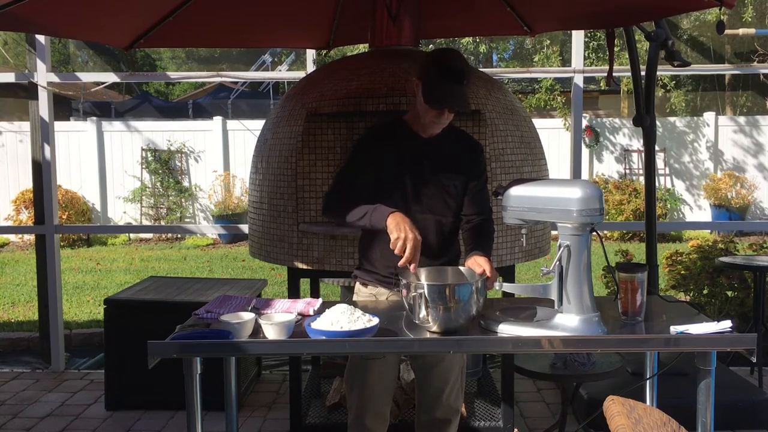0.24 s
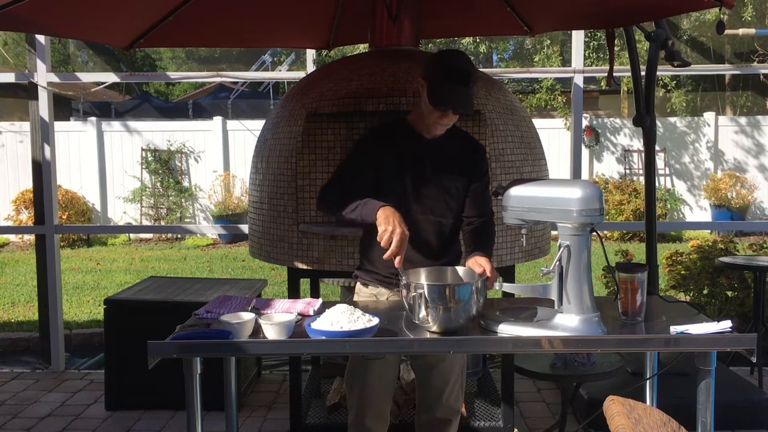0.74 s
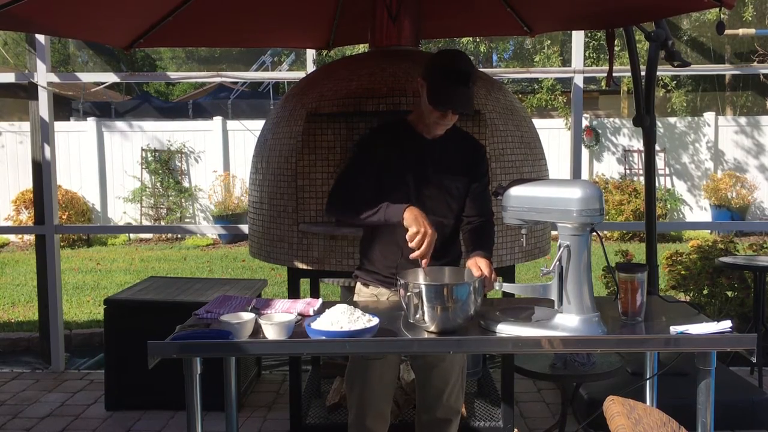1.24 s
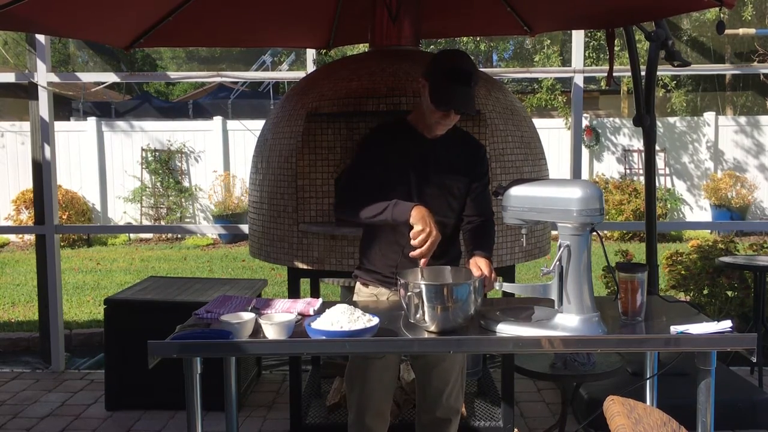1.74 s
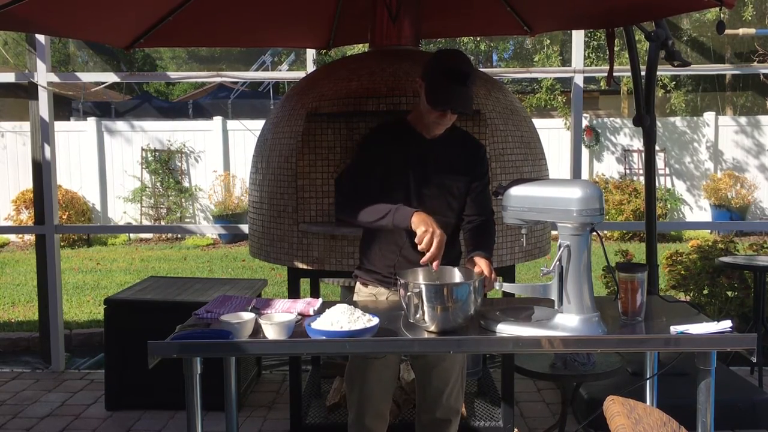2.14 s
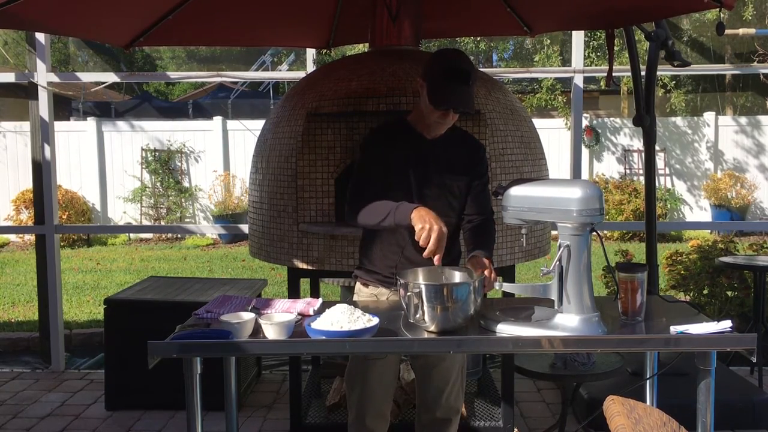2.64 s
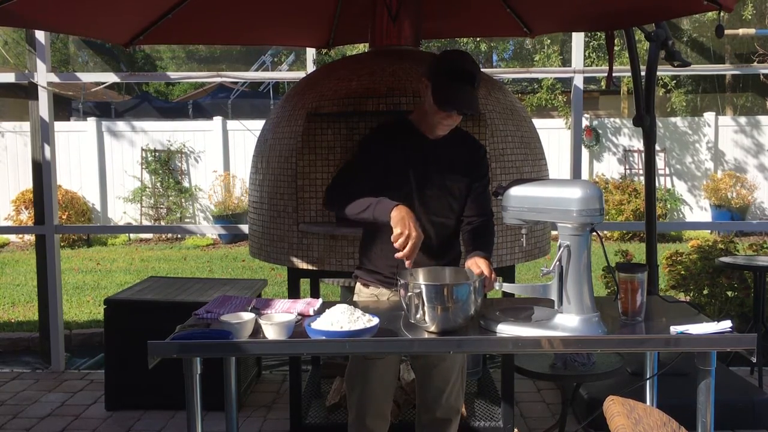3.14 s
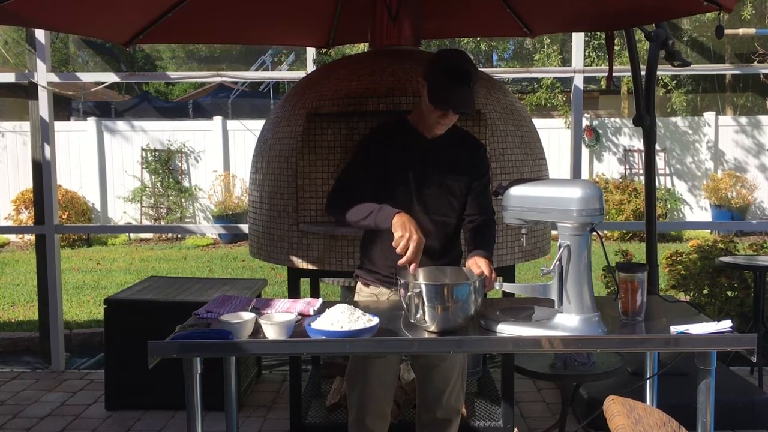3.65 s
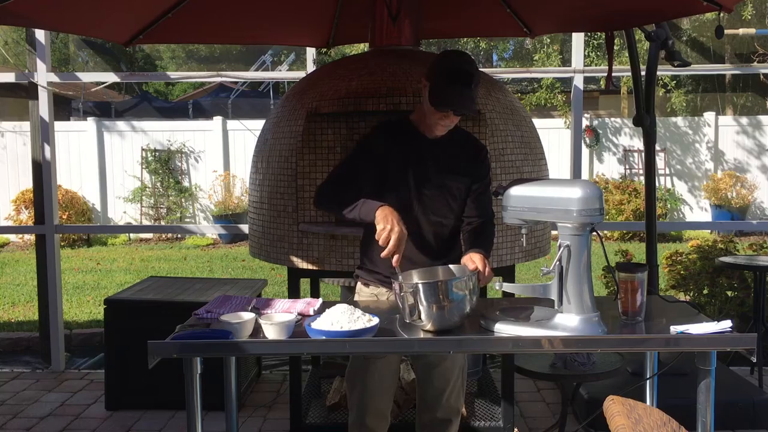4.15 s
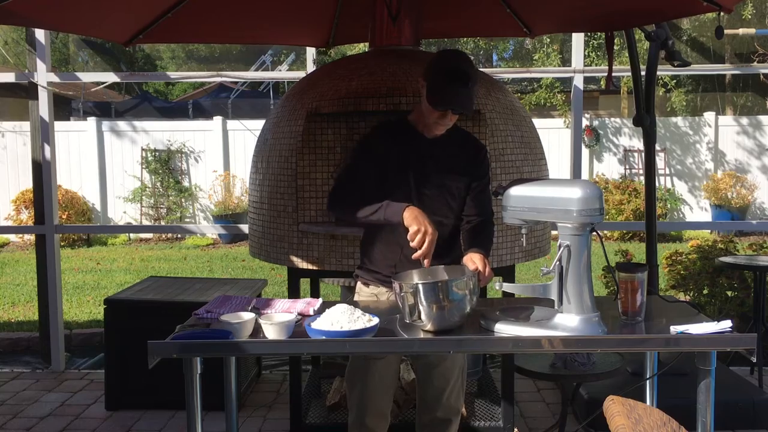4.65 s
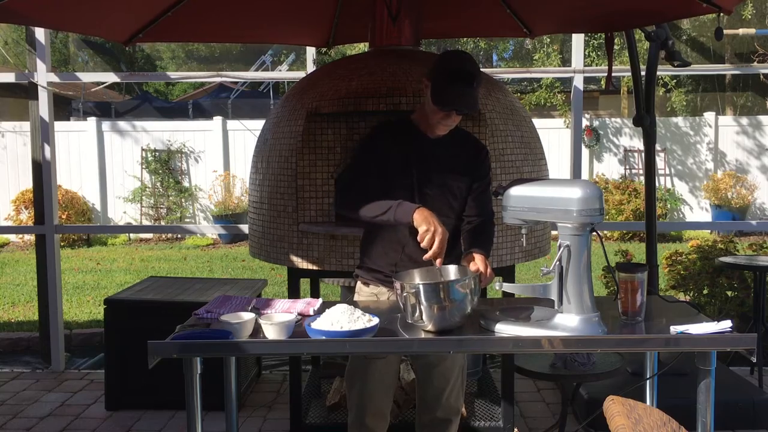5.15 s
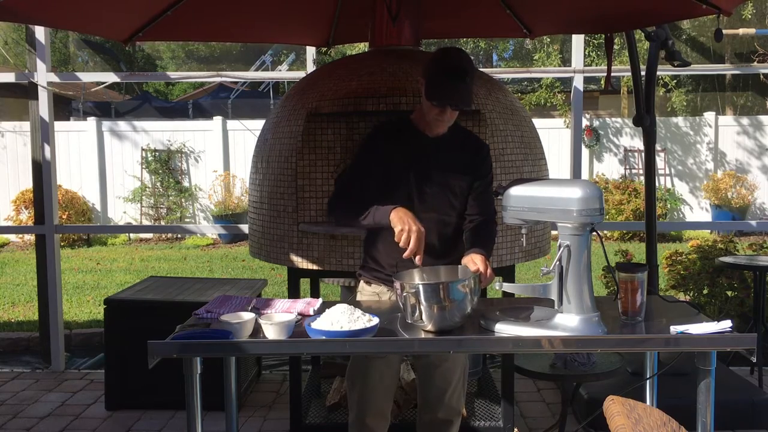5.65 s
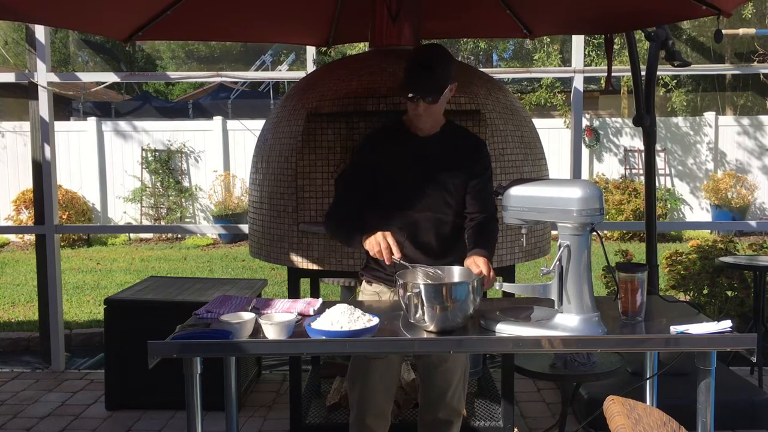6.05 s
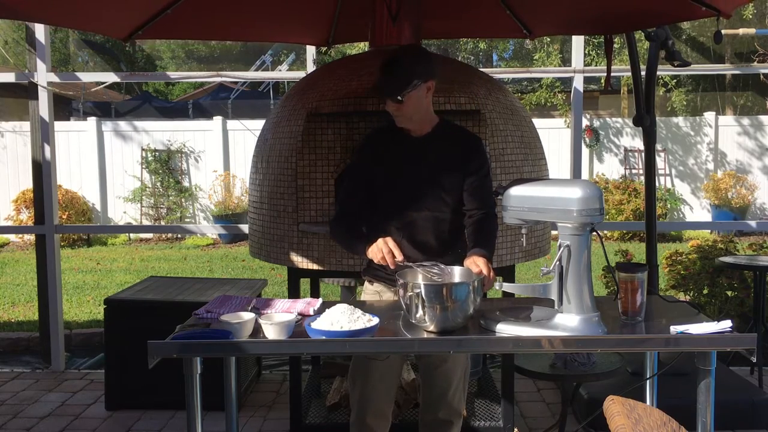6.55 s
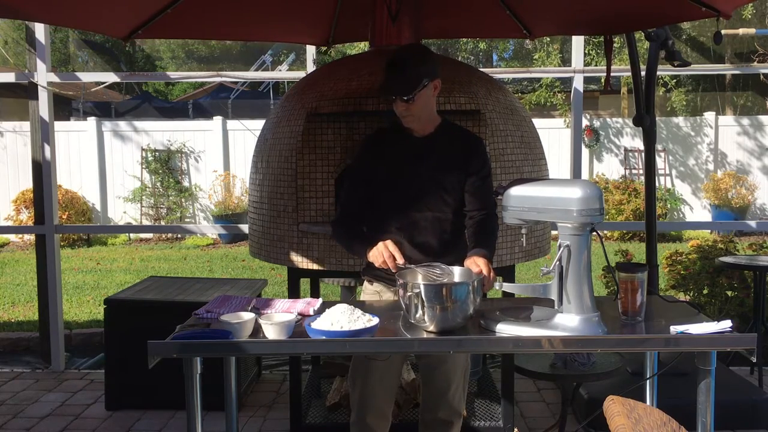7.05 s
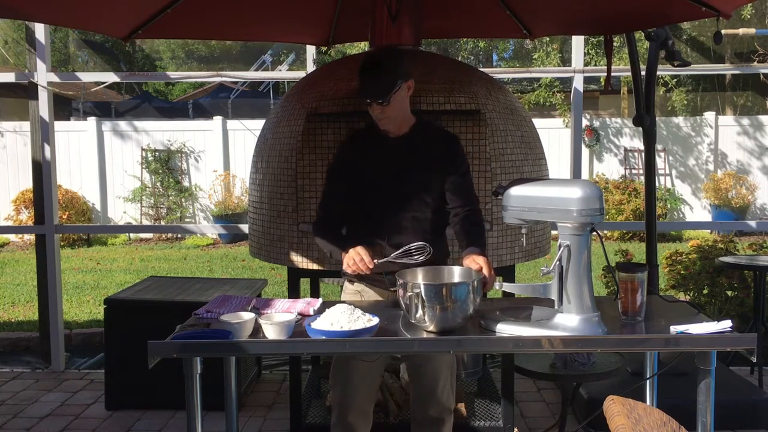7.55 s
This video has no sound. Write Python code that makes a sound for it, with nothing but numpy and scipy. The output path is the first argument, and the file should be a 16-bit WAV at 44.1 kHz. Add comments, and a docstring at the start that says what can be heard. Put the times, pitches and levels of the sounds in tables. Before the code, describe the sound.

On an open patio, a wire whisk sweeps around a steel bowl of thin batter, with bright scratchy swishes, irregular wire clinks and soft wet plops. After about six seconds it is knocked eight times on the rim, each a loud rattly metallic tap with a faint table thud and droplets. A brief slide ends it, leaving quiet air and low hum. One microphone, fairly dry.

```python
"""A wire whisk stirs thin batter in a steel bowl on a covered patio, over garden air and a distant hum.
Sweep by sweep, random wire contacts make whisk and bowl ring, while bubble tones slosh and plop.
Then the whisk is knocked eight times on the rim: chattering impacts ring the steel, thud and rock
the work table, and fling batter that patters back into the bowl. Last, the whisk slides off the rim."""
import sys
import numpy as np
from scipy import signal
from scipy.fft import rfft, irfft
from scipy.io import wavfile
from scipy.ndimage import uniform_filter1d

SR = 44100
rng = np.random.default_rng(int(sys.argv[2]) if len(sys.argv) > 2 else 0)


def log_audio(samples):
    """Write samples as a 16-bit WAV file to the path given in sys.argv[1]."""
    # one column per channel
    frames = np.atleast_2d(samples).T
    # limit to full scale, then quantise
    limited = np.clip(frames, -1, 1)
    pcm = np.round(limited * 32767).astype(np.int16)
    wavfile.write(sys.argv[1], SR, pcm)


N = 344421  # length of the scene in samples
T = np.arange(N) / SR  # time in seconds

# Ringing tones of the filled bowl: pitch_hz, relative level_db, t60_s (time to fall by 60 dB)
BOWL_TONES = [(658, -12, 0.44), (1069, 1.5, 0.13), (1740, -34, .12), (2140, 4.5, 0.1), (2390, -15, 0.1),
              (2347, 14.5, 0.014), (2700, 13, 0.038), (3113, 4, 0.061), (3670, 10, 0.074),
              (3908, 10.5, 0.041), (4310, 5, 0.074), (4900, -13, 0.1)]
# Tone colour of wires dragging on steel: frequency_hz, relative level_db
DRAG_COLOUR = [(200, -59), (1000, -28.5), (3000, -34), (5300, -16), (6200, -6), (7300, -1), (8500, -6),
               (10000, -13.5), (12000, -22.5), (15800, -33)]
# Whisk knocks on the rim: start_s, relative level_db, relative table_thud_db, chatter_length_s,
# wire_pitch_hz, relative flung_batter_db
RIM_KNOCKS = [(6.066, -14.5, -36.5, 0.011, 6500, -52), (6.243, -11, -40, 0.0057, 5860, -39),
              (6.395, -12, -32, 0.011, 7550, -28.5), (6.566, -11, -28, 0.016, 8100, -26.5),
              (6.728, -10, -30.5, 0.011, 6900, -22.5), (6.91, -8.5, -27.5, .0083, 6200, -31),
              (7.101, -11.5, -32, 0.0076, 6500, -36), (7.293, -13.5, -31.5, 0.013, 7800, -23)]


def amp(db):
    """Turns decibels into a gain."""
    return 10 ** (np.asarray(db) / 20)


def evened(x):
    """Scales a sound to an average (rms) level of 1."""
    return x / np.sqrt(np.mean(x ** 2) + 1e-20)


def read(points, hz):
    """Reads between the points of a frequency table, on a logarithmic frequency axis."""
    f, value = np.transpose(points)
    return np.interp(np.log(hz + 1), np.log(f + 1), value)


def add(mix, s, sound):
    """Mixes a sound in at time s."""
    part = mix[max(round(s * SR), 0):][:len(sound)]
    part += sound[:len(part)]


def through(x, response):
    """Passes a sound through a response (convolution) and keeps its length."""
    return signal.oaconvolve(x, response)[:len(x)]


def colour(points, size=4096):
    """Makes a filter of energy 1 with the given spectrum, acting only after its input arrives."""
    log_gain = np.log(amp(read(points, abs(np.fft.fftfreq(size, 1 / SR)))))
    spectrum = np.exp(np.conj(signal.hilbert(log_gain)))
    response = np.fft.ifft(spectrum).real[:size // 2]
    return response / np.linalg.norm(response)


def ring(modes):
    """An object struck once: a set of tones, each dying at its own speed, of total energy 1."""
    t = T[:SR // 2]
    response = np.zeros(len(t))
    for hz, db, t60 in modes:
        fade = np.exp(-np.log(1000) * t / t60)
        response += amp(db) * fade * np.sin(2 * np.pi * hz * t) * rng.choice([-1, 1])
    return response / np.linalg.norm(response)


def shimmer(t60, tick):
    """A tick, then a fading noise for the countless close tones of thin steel, flat overall."""
    t = T[:SR // 10]
    tail = rng.standard_normal(len(t)) * np.exp(-np.log(1000) * t / t60)
    tail /= np.linalg.norm(tail)
    tail[0] += tick
    z = rfft(tail)
    # dividing by the smoothed spectrum flattens the broad colour but keeps the fine detail
    flat = irfft(z / np.sqrt(uniform_filter1d(abs(z) ** 2, size=90)))
    return flat * np.cos(np.pi / 2 * t / t[-1])


def contacts(count, per_s, spread_db):
    """Tiny impacts at random moments, of either sign and uneven size unless the spread is 0; rms 1."""
    chance, size, side = rng.random((3, count), dtype=np.float32)
    at, out = chance < per_s / SR, np.zeros(count)
    strength = amp(spread_db * np.minimum(-np.log(1 - size[at]), 4))
    out[at] = strength * np.sign(side[at] - .5)
    return evened(out)


def burst(rise, length, per_s, spread_db):
    """A first touch, then a bunch of impacts that swells and dies; rms about 1 at its height."""
    t = T[:SR // 5]
    shape = np.minimum(0.35 + t / max(rise, 1e-4), 1) * np.exp(-(t / length) ** 2)
    shape /= shape.max()
    hits = contacts(len(t), per_s, spread_db)
    hits[0] = np.sqrt(SR / per_s) * 2  # the first touch
    hits *= shape
    return hits * np.linalg.norm(shape) / (np.linalg.norm(hits) + 1e-9)


def flutter(per_s):
    """A random wobble: straight lines between chance values drawn per_s times a second."""
    return np.interp(T * per_s, np.arange(SR // 10), rng.standard_normal(SR // 10))


def gesture(start, length, attack_s, sag_db_per_s, release_db_per_s):
    """Loudness of one movement over the whole scene: attack, a sagging hold, release."""
    t, out = T[:SR], np.zeros(N)
    fall_db = sag_db_per_s * t + release_db_per_s * np.maximum(t - length, 0)
    add(out, start, np.minimum(t / attack_s, 1) * amp(-fall_db))
    return out


def background():
    """Garden air is coloured noise of wavering level; a distant machine hums on a low tone."""
    # Tone colour of the air: frequency_hz, relative level_db
    air_colour = [(20, -5), (62, -7.5), (100, -5.5), (170, -15), (220, -13.5), (400, -19), (670, -18),
                  (1100, -21.5), (2000, -27.5), (4500, -27.5), (8300, -28.5), (12000, -36.5), (15800, -67)]
    noise = through(rng.standard_normal(N), colour(air_colour))
    air = amp(-43.5) * noise * amp(0.14 * flutter(per_s=8.5))
    # the hum's phase wanders slightly
    hum = amp(-43) * np.sin(2 * np.pi * 59 * T + 0.22 * flutter(per_s=2.5))
    return air + hum


def stirring():
    """Each sweep presses the wires on the wall and churns the liquid; the stronger of overlaps counts."""
    # Sweeps round the wall: start_s, length_s, press_on_s, relative scrape_db, relative churn_db
    strokes = [(0, 0.013, .005, -31, -43), (0.04, 0.18, 0.033, -26, -39), (0.309, .15, 0.026, -24, -37),
               (0.576, 0.11, .02, -25, -46.5), (0.765, 0.12, 0.015, -22, -41.5),
               (0.971, 0.25, 0.039, -26, -43.5), (1.223, 0.081, 0.016, -25, -42.5),
               (1.354, 0.27, 0.022, -28.5, -43), (1.644, 0.24, 0.023, -28.5, -45),
               (1.904, 0.094, 0.026, -23, -40.5), (2.023, 0.07, .025, -24, -40),
               (2.137, 0.045, .02, -25, -41), (2.219, 0.12, .02, -21.5, -37.5),
               (2.384, 0.19, .01, -36.5, -47.5), (2.685, 0.13, .025, -28.5, -46),
               (2.867, 0.27, 0.051, -24, -47), (3.061, 0.19, .02, -24, -46),
               (3.327, 0.23, 0.018, -24.5, -42), (3.624, 0.19, .02, -25.5, -40),
               (3.853, 0.24, 0.13, -26.5, -44), (4.203, 0.13, 0.018, -24.5, -43),
               (4.38, 0.23, 0.038, -27.5, -44), (4.52, 0.16, 0.08, -21, -44),
               (4.734, 0.22, 0.018, -27, -38.5), (4.985, 0.2, 0.011, -26.5, -37.5),
               (5.201, 0.2, .02, -27.5, -37.5), (5.415, 0.03, .02, -28, -37),
               (5.512, 0.09, 0.049, -22.5, -33.5)]
    # the wires ease off through the sweep, then leave the wall
    ease_db_per_s, lift_db_per_s = 0.5, 306
    # the liquid surges, settles through the sweep, then runs back
    surge_s, settle_db_per_s, drain_db_per_s = 0.024, 23, 115
    pressure, churn = np.zeros((2, N))
    for s, length, press_s, scrape_db, wet_db in strokes:
        press = amp(scrape_db) * gesture(s, length, press_s, ease_db_per_s, lift_db_per_s)
        slosh = amp(wet_db) * gesture(s, length, surge_s, settle_db_per_s, drain_db_per_s)
        pressure = np.maximum(pressure, press)
        churn = np.maximum(churn, slosh)
    return pressure, churn


def whisking(pressure, size=3000):
    """Wires stick and slip along the wall and clash on it; whisk and bowl ring with each contact."""
    # Wire loops hitting the wall in a bunch: start_s, relative level_db, rise_s, fade_length_s
    clashes = [(0.057, -12, 0.015, 0.031), (0.145, -21.5, .002, 0.012), (0.295, -16, 0.0022, 0.0074),
               (0.33, -6, 0.011, 0.025), (0.571, -9, .004, 0.026), (0.765, -14.5, 0.016, 0.033),
               (1.062, -20.5, .002, .017), (1.105, -19.5, .002, 0.015), (1.374, -27.5, .002, 0.0091),
               (1.472, -21, .005, 0.034), (1.741, -17, 0.0032, .0075), (1.814, -22, .002, 0.028),
               (2.137, -11.5, 0.0012, 0.025), (2.231, -14, .001, 0.0046), (2.244, -20, .004, 0.016),
               (2.433, -20, 0.0088, 0.016), (2.564, -31.5, .002, 0.012), (2.634, -24, .002, 0.0067),
               (2.657, -22.5, 0.0018, .014), (3.065, -14.5, 0.0052, 0.024), (3.319, -20, .002, 0.034),
               (3.618, -21, .0005, 0.02), (3.643, -14, .0036, 0.029), (3.907, -7, .003, 0.024),
               (3.974, -19, 0.0017, 0.017), (4.049, -21, .002, 0.021), (4.196, -9.5, 0.014, 0.019),
               (4.279, -20, 0.0018, 0.029), (4.502, -17.5, .001, 0.011), (4.754, -23, .002, 0.016),
               (4.795, -22.5, .002, 0.012), (4.86, -19.5, .002, 0.008), (4.989, -22, 0.0022, 0.0055),
               (5.215, -21, .002, 0.0076), (5.24, -18, 0.0044, 0.021), (5.288, -19.5, .002, 0.0093),
               (5.357, -24.5, .002, 0.016), (5.432, -24.5, .002, 0.03), (5.467, -18.5, .002, 0.0065),
               (5.606, -11.5, 0.022, 0.025)]
    # Tone colour of the clashing wires: frequency_hz, relative level_db
    wire_colour = [(100, -26), (350, -31), (1000, -20), (1900, -22), (2600, -15.5), (4600, -14.5),
                   (5500, -9), (6200, -1.5), (7300, 2), (8500, -1), (10000, -9.5), (11500, -16),
                   (15800, -28.5)]
    slips = contacts(N, per_s=3000, spread_db=0.0) * amp(3.8 * flutter(per_s=70))
    snags = amp(-5.5) * contacts(N, per_s=93, spread_db=4.0)
    drag = (slips + snags) * pressure * amp(-3.5)
    loops, clash, wires = np.zeros((3, N))
    # as the whisk turns, one loop after another takes the load, each with its own tones
    handover = np.sin(np.pi * np.arange(size) / size)
    for start in range(0, N - size, size // 2):
        load = drag[start:start + size] * handover
        add(loops, start / SR, signal.fftconvolve(load, shimmer(t60=0.019, tick=0.56)))
    for s, db, rise, length in clashes:
        hits = amp(db + 1.75) * burst(rise, length, per_s=1800, spread_db=4)
        add(clash, s, hits)
        add(wires, s, signal.fftconvolve(hits, shimmer(t60=0.018, tick=0.58)))
    bowl = through(amp(-22.5) * drag + amp(-20.5) * clash, ring(BOWL_TONES))
    return through(loops, colour(DRAG_COLOUR)) + through(wires, colour(wire_colour)) + bowl


def bubble(hz, cycles, glide):
    """A pocket of air ringing, its pitch rising as it nears the surface."""
    age = T[:SR // 10] * hz / cycles  # 1 when the fade has reached about a third
    tone = np.sin(2 * np.pi * cycles * (age + glide * age ** 2))
    tone *= np.exp(-age) * (1 - np.exp(-8 * age))
    return tone / np.linalg.norm(tone)


def liquid(churn, count=28):
    """Wet crackle and small bubbles follow the stirring; tone clusters are short bunches of
    bubble-like tones, from low to bright."""
    # Short clusters of bubble-like tones, low to bright, some sounding with the wire clashes:
    # start_s, relative level_db, pitch_hz, length_s
    tone_clusters = [(.276, -31.5, 336, 0.0048), (.078, -33, 2480, 0.018), (.296, -33, 1660, 0.029),
                     (.338, -40, 1324, 0.0075), (0.363, -33, 597, 0.027), (.622, -37.5, 1050, 0.013),
                     (0.847, -38, 1090, 0.014), (1.064, -36, 1170, 0.016), (1.133, -38.5, 226.5, 0.035),
                     (1.357, -32.5, 536, .019), (2.136, -37.5, 393, 0.035), (2.141, -22.5, 3500, .013),
                     (2.238, -30, 3040, .019), (3.322, -42, 450, 0.038), (3.638, -40.5, 500, 0.029),
                     (3.907, -25.5, 2240, .016), (5.283, -35.5, 1620, 0.045), (5.45, -26.5, 1400, 0.0088),
                     (5.452, -28.5, 2450, .012), (5.512, -39, 1180, 0.091), (5.531, -27, 2240, .018),
                     (5.564, -26.5, 2080, 0.05), (5.612, -19, 1900, 0.012), (5.613, -24, 854, 0.0061)]
    # Tone colour of the liquid: frequency_hz, relative level_db
    wet_colour = [(150, -12), (400, -3), (900, -7.5), (1850, -3), (2200, 7), (3000, 4), (5000, 1.5),
                  (9000, -22)]
    wet = through(contacts(N, per_s=1200, spread_db=2.0), colour(wet_colour)) * amp(-2.5)
    for hz in np.geomspace(380, 3600, count):
        pops = contacts(N, per_s=24, spread_db=3)
        small_bubbles = through(pops, bubble(hz, cycles=12.0, glide=0.0094))
        wet += amp(-14.0 + read(wet_colour, hz)) * small_bubbles
    wet *= churn
    for s, db, hz, length in tone_clusters:
        cluster = np.zeros(SR // 5)
        for step in (.85, 1, 1.15):  # three neighbouring pitches
            hits = burst(0.00067, length, per_s=1100, spread_db=3.0)
            cluster += through(hits, bubble(hz * step, cycles=4.7, glide=0.02))
        # a longer cluster carries more energy
        add(wet, s, amp(db - 1.5) * np.sqrt(length * SR) * cluster / np.linalg.norm(cluster))
    return wet


def patio(x):
    """Thin scatter from canopy, oven and paving, each band dying at its own speed."""
    # Echo fading: frequency_hz, t60_s (time to fall by 60 dB)
    echo_fade = [(200, 0.92), (2000, 0.24), (8000, 0.32), (16000, 0.22)]
    # echoes begin after 8 ms
    taps = contacts(SR // 2, per_s=1700, spread_db=2.5) * (T[:SR // 2] > .008)
    hz, t, z = signal.stft(taps, SR, nperseg=256)
    fade = np.exp(-np.log(1000) * t / read(echo_fade, hz)[:, None])
    tail = signal.istft(z * fade, SR, nperseg=256)[1]
    return through(x, tail / np.linalg.norm(tail))


def plops():
    """Single clear pings and plops in the bowl: lone dying tones that rise in pitch."""
    # start_s, level_db (before the fade), pitch_hz, ring_s (fade to about a third), upward glide (ratio)
    lone_tones = [(.578, -34, 667, 0.068, 0.0022), (.622, -17.5, 3500, 0.0031, 0.029),
                  (1.062, -21.5, 2044, 0.019, 0.02), (1.063, -29, 1256, 0.015, 0.035),
                  (1.507, -38, 1057, 0.016, .0099), (3.991, -32.5, 1035, .014, .01),
                  (5.65, -26, 447, 0.0099, 0.12), (5.775, -36.5, 1530, .01, 0.06)]
    out, t = np.zeros(N), T[:SR // 3]
    for s, db, hz, ring_s, glide in lone_tones:
        age = t / ring_s
        tone = np.sin(2 * np.pi * hz * t * (1 + glide * age))
        add(out, s, amp(db) * tone * np.exp(-age) * (1 - np.exp(-10 * age)))
    return out


def knocking():
    """Wires chatter on the rim, the table thuds, flung batter lands a moment later; last, a slide."""
    # Ringing tones of whisk and rim: pitch_hz, relative level_db, t60_s (time to fall by 60 dB)
    rim_tones = [(4460, -5.5, 0.12), (4720, -7, 0.12), (5500, -13, 0.092), (5700, -2, 0.07),
                 (5960, -2.5, .08), (6110, 3, 0.063), (6700, -7, 0.078), (7370, 12, 0.041),
                 (7400, -9, 0.075), (7700, -13, .05), (7860, -3.5, 0.066), (8920, 3, .06),
                 (9800, 1.5, 0.051)]
    # Tone colours of the knocked steel, the thudding table and the landing batter:
    # each lists frequency_hz, relative level_db
    steel_colour = [(200, -41), (1500, -25), (3700, -16.5), (4600, -5.5), (6200, 2.5), (7600, 5.5),
                    (8700, -5.5), (10200, -11.5), (11500, -14.5), (15800, -39)]
    thud_colour = [(30, -9), (120, 2), (280, 1.5), (600, -2.5), (1100, -17.5), (3000, -31)]
    splat_colour = [(60, -8), (130, -1.5), (300, 5.5), (600, -3), (1000, -11), (2500, -14.5), (5000, -19),
                    (8500, -13), (12000, -20.5), (15800, -41)]
    # Light wire ticks as the whisk is lifted or settles: start_s, relative level_db
    wire_ticks = [(6.11, -41), (6.315, -39), (6.52, -49), (6.69, -37), (7.224, -44), (7.339, -24),
                  (7.67, -46)]
    flight_s, splat_s = .046, 0.051  # delay from knock to landing, and length of the patter
    out, thuds, splats = np.zeros((3, N))
    rim, bowl, steel = ring(rim_tones), ring(BOWL_TONES), colour(steel_colour)
    for s, db, thud_db, length, hz, splat_db in RIM_KNOCKS:
        chatter = burst(0.00037, length, per_s=4800, spread_db=0.5)
        # the first blow and the chatter after it both feed the ring
        tone = rim[:len(chatter)] + evened(through(chatter, rim)) / np.sqrt(len(chatter))
        tone *= np.linalg.norm(chatter) / np.linalg.norm(tone)
        wires = through(chatter, shimmer(t60=0.048, tick=0.58))
        # the loop that takes the blow stresses its own band
        own_band = np.diff(ring([(hz, 0, .002)]))
        wires = amp(-1) * through(wires, steel) + amp(-12.0) * through(wires, own_band)
        add(out, s, amp(db) * (wires + amp(-6.0) * tone + amp(-31) * through(chatter, bowl)))
        add(thuds, s, amp(thud_db) * burst(.001, 0.041, per_s=900, spread_db=1.0))
        add(splats, s + flight_s, amp(splat_db) * burst(0.006, splat_s, per_s=900, spread_db=0.5))
    for s, db in wire_ticks:
        hits = burst(.002, 0.01, per_s=2300, spread_db=5.0)
        add(out, s, amp(db) * through(hits, colour(DRAG_COLOUR)))
    # after the last knock the whisk slides off the rim
    slide_move = gesture(7.41, length=0.11, attack_s=0.021, sag_db_per_s=0, release_db_per_s=680)
    rub = contacts(N, per_s=1300, spread_db=-2.0) * amp(-30.5) * slide_move
    slide = amp(-8.0) * through(rub, rim) + amp(-7.0) * through(rub, steel)
    table = through(thuds, colour(thud_colour))
    bowl_on_table = amp(-4) * through(table, bowl)
    return out + slide + table + bowl_on_table + through(splats, colour(splat_colour))


def sway():
    """The table rocks on its legs after every knock: a low rumble, stronger after harder thuds."""
    # Tone colour of the rocking: frequency_hz, relative level_db
    rock_colour = [(20, -2.5), (42, 11), (70, -25), (120, -6), (250, -17.5), (700, -48.5)]
    hold_s, fade_db_per_s = 0.11, 65
    follows = 0.19  # dB of rocking per dB of thud
    hardest = max(row[2] for row in RIM_KNOCKS)
    power = np.zeros(N)
    for s, _, thud_db, *_ in RIM_KNOCKS:
        rocking = gesture(s, hold_s, 0.0097, 0, fade_db_per_s)
        power += (amp(follows * (thud_db - hardest)) * rocking) ** 2
    return amp(-35.5) * np.sqrt(power) * through(rng.standard_normal(N), colour(rock_colour))


def scene():
    """Everything reaches one microphone, alike in both channels."""
    pressure, churn = stirring()
    near = whisking(pressure) + liquid(churn) + plops() + knocking()
    mono = near + amp(-15.5) * patio(near) + sway() + background()
    return np.tile(mono, (2, 1))


def record(dry):
    """The loudest peaks are rounded off; then the highest treble is cut."""
    ceiling, edge_hz = .75, 15900
    rounded = dry / (1 + (dry / ceiling) ** 4) ** (1 / 4)
    lowpass = signal.firwin(401, edge_hz, window=("kaiser", 8), fs=SR)
    return signal.oaconvolve(rounded, lowpass[None], "same", axes=1)


dry = scene()
out = record(dry)
log_audio(out)
```